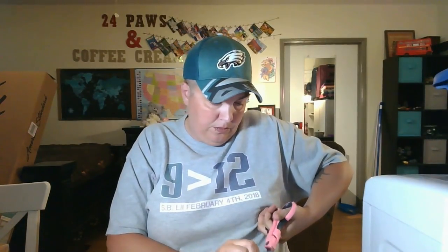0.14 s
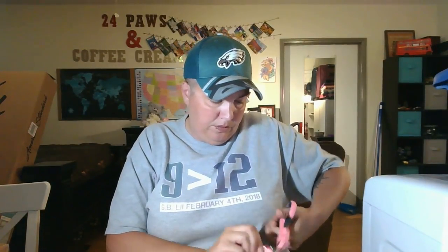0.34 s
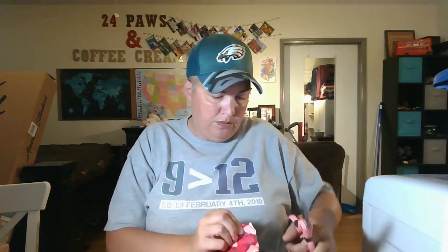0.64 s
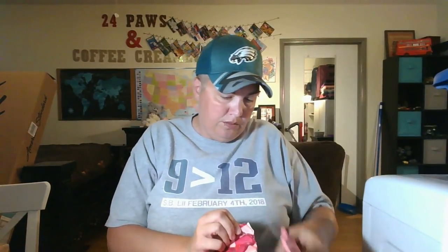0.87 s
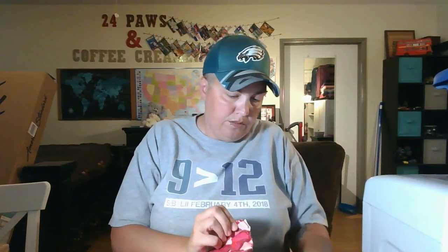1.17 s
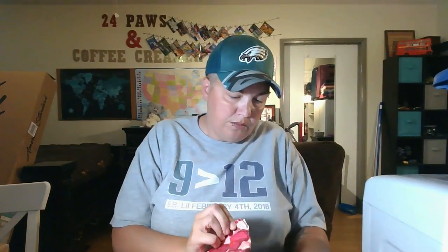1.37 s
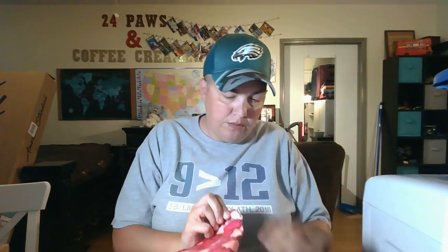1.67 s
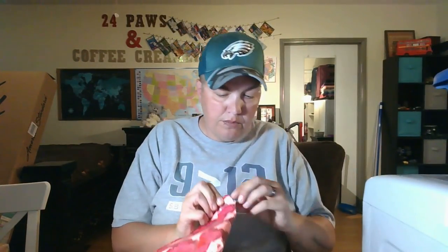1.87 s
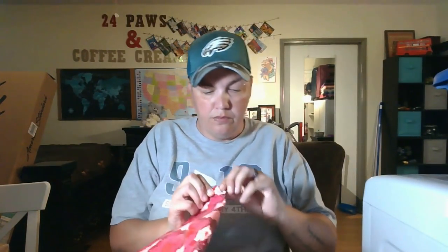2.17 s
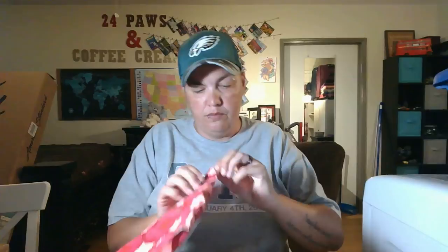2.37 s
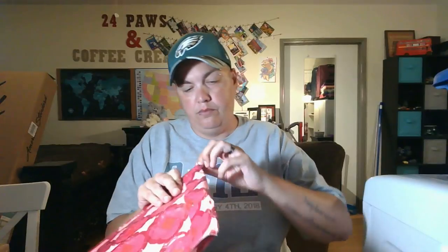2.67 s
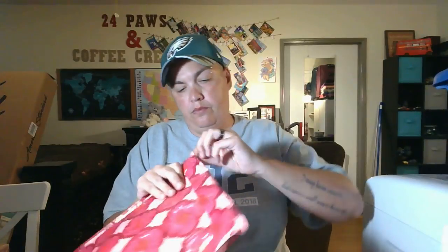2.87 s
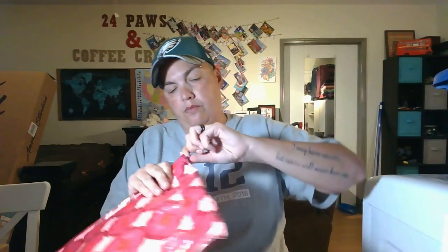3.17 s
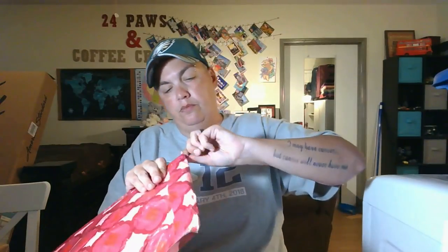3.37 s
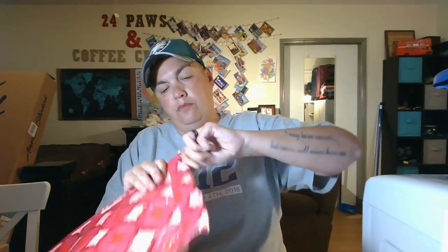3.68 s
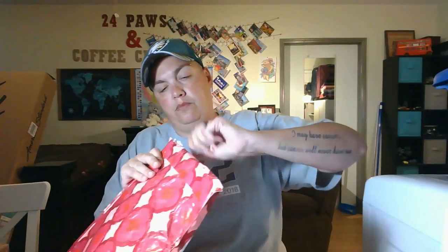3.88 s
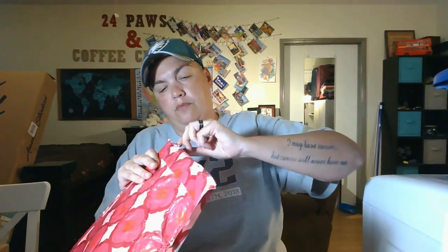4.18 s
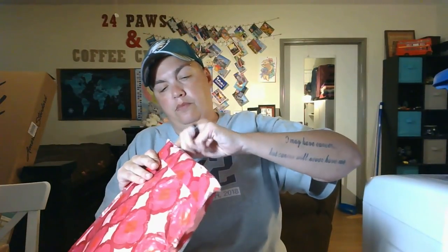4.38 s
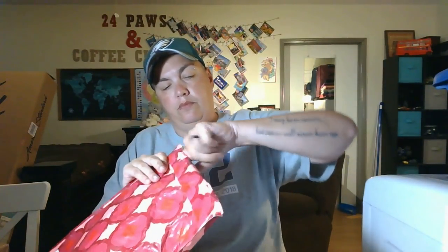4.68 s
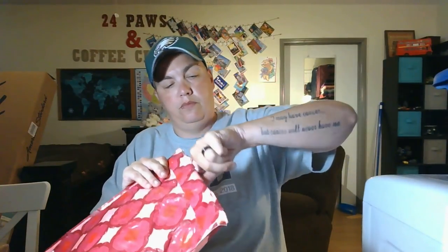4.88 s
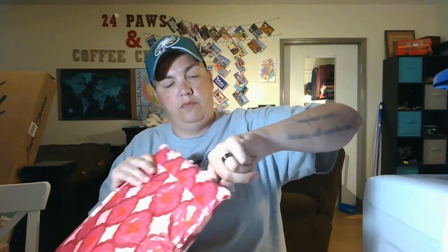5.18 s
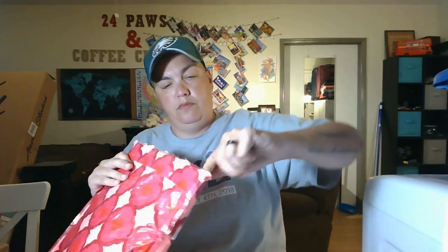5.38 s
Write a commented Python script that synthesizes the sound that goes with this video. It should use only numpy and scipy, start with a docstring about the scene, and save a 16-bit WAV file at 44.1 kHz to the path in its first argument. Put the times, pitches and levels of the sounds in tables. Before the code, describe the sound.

In a small, dull-sounding room, someone unwraps a gift near a low-quality microphone. A few light paper crinkles come first, with short gaps of dead silence. A tool clacks and slides on a tabletop, which thumps several times. After that the paper crackles and rips in quick, uneven strokes, with fingers rubbing and the hollow package popping softly underneath, loudest in the last second.

```python
"""Hands crumple, pull and tear the paper wrapped round a hollow package, close to a webcam indoors.
Each stroke buckles the sheet in countless tiny impulses; creases snap, the sheet pops, fingers rub,
and the package resonates. Early on a tool is dropped and slid on the table, whose modes boom.
The webcam samples at a low rate and passes sound only in stretches, with dead silence between them."""
import sys
import numpy as np
from scipy import signal
from scipy.fft import rfft, irfft, next_fast_len
from scipy.io import wavfile
from scipy.ndimage import uniform_filter1d, map_coordinates

SR = 44100
rng = np.random.default_rng(int(sys.argv[2]) if len(sys.argv) > 2 else 0)


def dump(signal):
    """Clip the signal to [-1, 1] and save it as 16-bit WAV at the path in sys.argv[1]."""
    limited = np.clip(np.atleast_2d(signal).T, -1, 1)
    pcm = np.round(limited * 32767).astype(np.int16)
    wavfile.write(sys.argv[1], SR, pcm)


N = 244314
T = np.arange(N) / SR


def amp(db):
    return 10 ** (np.asarray(db) / 20)


def unit(x):
    return x / np.sqrt(np.mean(x ** 2) + 1e-20)


def decay(t, t60):
    """Exponential damping: unity until t = 0, then 60 dB down every t60 seconds."""
    return amp(-60 * np.maximum(t, 0) / t60)


def rise(t, tau):
    """First-order onset from t = 0, with time constant tau in seconds."""
    return 1 - np.exp(-np.maximum(t, 0) / tau)


def after(start, lasts):
    """The samples of an event, and the time since its start."""
    span = slice(round(start * SR), round((start + lasts) * SR))
    return span, np.maximum(T[span] - start, 0)


def wobble(rate):
    """Smooth random modulation, with rate knots a second."""
    return map_coordinates(rng.standard_normal(int(N * rate / SR) + 4), [T * rate])


def filtered(x, response):
    """Linear filtering: the spectrum of x times a frequency response."""
    size = next_fast_len(N + SR // 2)
    return irfft(rfft(x, size) * response(np.fft.rfftfreq(size, 1 / SR)), size)[:N]


def modes(rows):
    """Modal superposition: resonances (frequency in Hz, bandwidth in Hz, dB) add with alternating sign."""
    return lambda f: sum((-1) ** k * amp(db) * 1j * f * width / (hz * hz - f * f + 1j * f * width)
                         for k, (hz, width, db) in enumerate(rows))


def grains(count, hz, spread, cycles, scatter_db, samples):
    """Shot noise: damped sines at random times and levels, their pitches log-normal about hz."""
    start = rng.integers(0, N, count)[:, None]
    pitch = np.clip(hz * np.exp(spread * rng.standard_normal((count, 1))), 60, SR / 5)
    level = amp(scatter_db * np.minimum(rng.exponential(size=(count, 1)), 3.5))
    sign = rng.choice([-1, 1], (count, 1))
    turns = pitch * np.arange(samples) / SR
    wave = sign * level * np.sin(2 * np.pi * turns) * np.exp(-turns / cycles) * np.sqrt(pitch)
    return unit(np.bincount((start + np.arange(samples)).ravel(), wave.ravel(), N + samples)[:N])


def drifting(x, depth_db, bins=8, frames=14):
    """Spectral modulation: random patches of gain in frequency and time make the timbre drift."""
    spectrum = signal.stft(x, nperseg=256)[2]
    field = uniform_filter1d(rng.standard_normal(spectrum.shape), bins, axis=0)
    field = uniform_filter1d(field, frames, axis=1)
    return unit(signal.istft(spectrum * amp(depth_db * unit(field)), nperseg=256)[1][:N])


def patchy(depth_db):
    """Modulated white noise whose timbre flickers."""
    return drifting(rng.standard_normal(N), depth_db, bins=4, frames=9)


def room(x):
    """Reverberation: a small furnished room answers with a short, dull tail."""
    t = np.arange(SR // 3) / SR
    tail = rng.standard_normal(len(t)) * decay(t, 0.093)
    wet = signal.fftconvolve(np.pad(x, (300, 0)), tail / np.linalg.norm(tail))[:N]
    return filtered(wet, modes([(1350, 7800, 0.016)]))


# Modes of the table top. Each row: frequency in Hz, bandwidth in Hz, gain in dB.
TABLE_MODES = [(119.7, 21.3, 0), (174, 27.3, 0), (211.1, 13.8, 5.5), (275, 28, 3), (444, 67, -8),
               (580, 41, -26)]
# Blows of the tool. Each row: start in seconds, level in dB, chatter length in seconds, clatter in dB,
# main pitch in Hz, hum in dB, seconds until the hum is damped, then the second, third and lowest
# mode in dB. All later dB values are relative to the level.
TOOL_BLOWS = [(1.151, -23, 0.0067, -19.5, 227, -19, .01, -6.5, -3.5, -11),
              (1.159, -7.5, 0.047, -15.5, 185.7, -25, 0.33, -5, -10, -1),
              (1.214, -11, 0.029, -15.5, 185, -16, 0.25, 1, -2, -11),
              (1.252, -11.5, 0.0076, -34, 148, -20, 0.034, -7, -14, -8),
              (1.459, -20, 0.035, -21, 279.3, -7.5, 0.062, -8.5, -9.5, -7.5),
              (1.522, -5, 0.044, -25.5, 189, -16, 0.12, -5.5, -15, -11),
              (1.653, -5, 0.047, -25.5, 197.7, -10, 0.1, -12, -15.5, -11),
              (1.756, -11.5, 0.047, -25.5, 204.2, -9, 0.071, -2.5, -16, -16),
              (1.881, -26, 0.018, -30.5, 189.5, -23.5, 0.03, -13.5, -27, -20.5),
              (1.917, -28, 0.022, -33, 201, -26, 0.034, -14, -18.5, -6)]


def tool_on_table(hum_gain):
    """Forced vibration: the chattering tool and the package drive the table's modes; the tool clatters."""
    free_t60_s, hand_damped_t60_s, lowest_hz = 1.07, 0.1, 120.9
    boom_gain, clatter_gain, tones = hum_gain.copy(), np.zeros(N), np.zeros(N)
    waver = wobble(40)
    for start, db, lasts, clatter_db, hz, hum_db, hum_s, second_db, third_db, low_db in TOOL_BLOWS:
        t = np.maximum(T - start, 0)
        chatter = rise(t, 0.0012) * decay(t - lasts, 0.053)
        hum = rise(t, 0.013) * decay(t, free_t60_s) * decay(t - hum_s, hand_damped_t60_s)
        boom_gain += amp(db - 7.5) * chatter + amp(db + hum_db) * hum
        partials = [(hz, 0, 0.5), (272, second_db, -0.5), (451, third_db, 1.3),
                    (578, third_db - 8.5, -0.99)]
        for mode_hz, mode_db, waver_rad in partials:
            tones += amp(db + mode_db) * chatter * np.sin(2 * np.pi * mode_hz * t + waver_rad * waver)
        lingering = chatter + (t > 0) * amp(-12.5) * decay(t, 1.2)
        tones += amp(db + low_db) * lingering * np.sin(2 * np.pi * lowest_hz * t + 0.34 * waver)
        contact = chatter * decay(t, 0.69) + 0.54 * (t > 0) * decay(t, 0.0098)
        ring = amp(-3) * rise(t, 0.0021) * decay(t, 0.33)
        clatter_gain += amp(db + clatter_db) * (contact + ring)
    pushes = grains(1500, hz=540, spread=0.9, cycles=0.13, scatter_db=-1.5, samples=300)
    boom = filtered(pushes + 0.5 * rng.standard_normal(N), modes(TABLE_MODES))
    boom /= np.abs(uniform_filter1d(boom ** 2, size=900)) ** 0.3  # limiter-like levelling steadies it
    return boom_gain * unit(boom) + tones + clatter_gain * tool_clatter()


# Modes of the tool. Each row: frequency in Hz, bandwidth in Hz, gain in dB.
TOOL_MODES = [(547, 31, 13.5), (767, 81, 6), (988, 70, 8), (1313, 240, 3), (1910, 157, 1.5), (2180, 83, 2),
              (2540, 51, -3.5), (2700, 240, -13.5), (4870, 1500, -19)]


def tool_clatter():
    """Broadband excitation: noise and tiny impacts sound the tool's own resonances."""
    noise = patchy(4.5)
    impacts = grains(3000, hz=2306, spread=0.69, cycles=0.24, scatter_db=-0.5, samples=80)
    return unit(filtered(noise + 0.15 * impacts, modes(TOOL_MODES)))


# Strikes of the tool's edge. Each row: start in seconds, level in dB, pitch in Hz, relative ring in dB.
EDGE_STRIKES = [(1.16, -14, 4250, -19), (1.223, -31, 4930, -3), (1.527, -32, 1480, -14),
                (1.654, -11, 2970, -9)]
# Modes of the blades. Each row: frequency in Hz, gain in dB, 60 dB decay time in seconds.
BLADE_MODES = [(1210, 3.5, .04), (2260, -9.5, 0.091), (2720, -15, 0.17), (3070, -16, 0.049),
               (3280, -6.5, 0.029)]


def tool_clacks():
    """Hard impact: a burst of band noise, after which the blades ring in free vibration."""
    x, noise = np.zeros(N), rng.standard_normal(N)
    for start, db, hz, ring_db in EDGE_STRIKES:
        burst = amp(db) * noise * rise(T - start, 0.00068) * decay(T - start, 0.011)
        x += filtered(burst, modes([(hz, 1500, 6)]))
        span, t = after(start, 0.3)
        for mode_hz, mode_db, t60 in BLADE_MODES:
            level = amp(db + ring_db + mode_db + rng.normal(0, 1.7))
            x[span] += level * decay(t, t60) * np.sin(2 * np.pi * mode_hz * t)
    return x


# Light rubs. Each row: start and length in seconds, then level at the body and at the open end in dB.
FINGER_RUBS = [(0.49, 0.22, -47, -48.5), (0.774, 0.16, -65, -65.5), (0.983, 0.11, -80, -58.5),
               (3.894, 0.18, -45.5, -40.5), (4.06, 0.087, -58, -62), (4.16, 0.16, -50, -47.5),
               (4.802, 0.046, -37, -41), (5.022, 0.13, -26.5, -24), (5.264, 0.17, -49, -32.5)]
# Rubbed modes of the body and of the open end. Each row: frequency in Hz, bandwidth in Hz, gain in dB.
RUB_BODY_MODES = [(686, 95, 2.5), (920, 340, -5.5)]
RUB_END_MODES = [(1202, 72, 6.5), (940, 310, -6.5)]


def finger_rubs():
    """Friction noise: sliding fingers excite the middle resonances of the package."""
    body = unit(filtered(patchy(2.5), modes(RUB_BODY_MODES)))
    open_end = unit(filtered(patchy(2.1), modes(RUB_END_MODES)))
    x, fade_s = np.zeros(N), 0.034
    for start, lasts, body_db, end_db in FINGER_RUBS:
        contact = np.clip(np.minimum(T - start, start + lasts - T) / fade_s, 0, 1)
        x += contact * (amp(body_db) * body + amp(end_db) * open_end)
    return x


# Flexes of the sheet. Each row: start in seconds, level in dB, pitch in Hz.
SHEET_FLEXES = [(2.413, -12, 466), (2.554, -19.5, 479), (2.577, -13, 257.5), (2.823, -16.5, 455),
                (2.979, -16.5, 266), (3.214, -13.5, 262), (3.27, -22, 253), (3.299, -22.5, 583),
                (3.422, -24.5, 483), (3.468, -17, 227), (3.561, -13.5, 458), (3.613, -15.5, 231),
                (3.667, -13, 485), (3.72, -14, 473), (3.755, -12, 468), (3.815, -17.5, 493),
                (4.379, -15.5, 524), (4.419, -21, 457), (4.549, -13, 617), (4.611, -9, 630),
                (4.639, -17, 600), (4.719, -14, 588), (4.75, -13.5, 595), (4.795, -11.5, 253),
                (4.957, -11.5, 208), (5.049, -16, 302), (5.129, -13, 475), (5.224, -10.5, 540),
                (5.299, -14, 459), (5.349, -22, 563)]


def sheet_pops():
    """Damped oscillation: the sheet flexes over the hollow with a soft, low, wavering tone."""
    x, waver = np.zeros(N), wobble(60)
    for start, db, hz in SHEET_FLEXES:
        span, t = after(start, 0.5)
        envelope = amp(db) * rise(t, 0.004) * decay(t, 0.073)
        x[span] += envelope * np.sin(2 * np.pi * hz * t + 0.62 * waver[span])
    return x


# Modes of the hollow package, three of the body and then two of the open end.
# Each row: frequency in Hz, bandwidth in Hz, gain in dB.
PACKAGE_MODES = [(472, 55, -1), (615, 60, -1), (940, 140, -10), (1215, 110, 1), (1370, 120, -3)]
# Snapping creases. Each row: start in seconds, strength in dB, pitch in Hz, relative thump drive in dB.
CREASE_SNAPS = [(0.34, -29, 5250, -11), (0.3459, -32, 1740, 9), (0.3715, -10, 2470, 8.5),
                (0.4987, -26.5, 1450, 7), (0.5167, -26.5, 4420, 6), (0.719, -45.5, 5460, -5),
                (0.8487, -40.5, 6020, -19), (0.958, -49, 6220, -11.5), (1.337, -36, 2050, 9),
                (1.4223, -33, 4340, -6), (1.971, -23, 5990, 1.5), (2.106, -50, 2050, -14),
                (2.1625, -32, 3470, -7), (2.282, -6.5, 3060, -34), (2.409, -10.5, 1526, 4.5),
                (2.5524, -23.5, 1570, 7), (2.6653, -6, 5040, -30), (2.735, -22.5, 2070, -29),
                (2.8186, -30, 2840, 12.5), (2.913, -25, 7260, -28), (3.0625, -7, 1387, -38),
                (3.067, -8, 887, -28), (3.072, -20, 2670, -21), (3.1804, -26, 3880, 6.5),
                (3.218, -13, 1220, -1), (3.349, -10.5, 2880, -26), (3.4537, -21, 2570, -3),
                (3.5136, -7.5, 5240, -6), (3.5468, -15, 2660, -25), (3.5982, -14.5, 1507, -24),
                (3.6365, -5.5, 2780, -20), (3.6606, -4, 1460, -18.5), (3.6903, -5, 2990, -32),
                (3.7054, -7, 2860, -30), (3.716, -9, 2930, -27), (3.737, -9, 2350, -37),
                (3.7753, -6, 2475, -7.5), (3.8075, -20, 2340, -15), (3.8335, -5.5, 1287, -26),
                (3.836, -11.5, 3480, -30), (3.855, -12.5, 2144, -15), (4.1124, -37.5, 3400, -17),
                (4.3732, -19, 2255, -24), (4.404, -13.5, 2130, -18), (4.5216, -10.5, 2956, -26),
                (4.5343, -4.5, 2504, -29), (4.705, -9, 2410, 4), (4.7326, -10, 2320, -24),
                (4.751, -12, 2494, -12), (4.79, -8.5, 2575, -12), (4.8522, -11, 1257, -11),
                (4.855, -19.5, 2340, -22), (4.924, -8, 2520, -31), (4.964, -10.5, 5360, -15),
                (4.985, -11, 4560, -21), (4.9926, -5, 2720, -22), (5.0824, -9, 2216, 3),
                (5.111, -6, 2080, -8.5), (5.1576, -7.5, 4390, -6), (5.248, -10, 1735, 9.5),
                (5.135, -5, 1327, -18), (5.279, -7, 1335, -16), (5.294, -9, 3370, -25),
                (5.349, -16.5, 3680, -12), (5.2693, -6.5, 1243, -4), (5.3051, -8, 1575, 0.5),
                (5.529, -2.5, 2330, -11)]


def crease_snaps():
    """Impulse response: a crease cracks, rings its facet, leaves a papery tail and thumps the package."""
    cracks, blows = np.zeros(N + SR), np.zeros(N)
    t = np.arange(SR // 8) / SR
    for start, db, hz, thump_db in CREASE_SNAPS:
        noise, wander = rng.standard_normal((2, len(t)))
        phase = 2 * np.pi * hz * t + 0.22 * np.cumsum(wander)
        partials = np.sin(phase) + 0.5 * np.sin(0.57 * phase) + 0.14 * np.sin(2.8 * phase)
        crack = (2.3 * np.sin(phase) + 1.4 * noise) * decay(t, 0.006)
        facet = (0.064 * noise + 0.32 * partials) * decay(t, 0.033)
        tail = 0.021 * noise * decay(t, 0.18)
        onset = round(start * SR)
        cracks[onset:onset + len(t)] += amp(db) * (crack + facet + tail) * rise(t, 0.0008)
        blows[onset] = amp(db + thump_db + 24)
    thumps = filtered(blows, modes([(343, 164, 4.4), *PACKAGE_MODES]))
    return filtered(cracks[:N], modes([(2900, 8100, 0.0026)])) + thumps


# Strokes of the hands. Each row: start and hold in seconds, crackle level in dB, drift over the hold
# in dB, then drum, table hum, open end and folded flap in dB relative to the crackle.
HAND_STROKES = [(0, 0.067, -35.5, -31.5, -13, -12, -12, -2.5), (0.325, 0.088, -43.5, 7, 10.5, 5.5, -11, -7),
                (0.482, 0.22, -41, -22, 5, 2, 3, -16), (0.714, 0.22, -64, -5, -1, 1, -6.5, -10),
                (0.96, 0.13, -69, -2, -1, -2.5, -2.5, -16.5), (1.355, 0.08, -57.5, 1.5, 7, 6, -3.5, -8),
                (1.788, 0.12, -63, 0, -6, -6, -4, -15), (1.863, 0.13, -66, 20.5, 5, 9, -1, -20),
                (2.088, 0.14, -56.5, 10.5, 6, 6.5, -4.5, -7),
                (2.272, 0.066, -30, -5.5, -8.5, -10.5, -5.5, -17),
                (2.376, 0.013, -27.5, -13.5, -4, -12, -10, -17),
                (2.399, 0.12, -32, -13, 2, -11.5, -14, -1.5), (2.505, 0.055, -42.5, 1.5, 9, 6, 3, -3),
                (2.55, 0.095, -27, -5.5, -4, -12, -9.5, -7), (2.661, 0.046, -24.5, -9, -0.5, -18, -3, -12),
                (2.725, 0.028, -34, -8, -5, -13, -11, -18), (2.772, 0.041, -45, 5, -14, -22, -12, -9),
                (2.81, 0.12, -36.5, -13.5, 8, 1.5, -3.5, -5),
                (2.917, 0.11, -28.5, -4.5, 0, -17.5, -11.5, -8.5),
                (3.045, 0.057, -25.5, -4, -4, -14, -10, -11), (3.098, .09, -39, 2.5, -1, -3, -2, -0.5),
                (3.194, 0.16, -28.5, -7, 0, -12, -7.5, -23), (3.372, 0.07, -45.5, 2.5, 0.5, -9.5, -7, -1),
                (3.446, 0.11, -33.5, 9, -3, -16.5, -18.5, -6), (3.583, 0.086, -31.5, 2, 4, -9, 3, 0),
                (3.681, 0.09, -22.5, 0.5, -4, -5.5, -19, 0.5), (3.792, 0.056, -40.5, 7.5, -2, -8, 5.5, 2),
                (3.886, 0.13, -47.5, 1, 2, -4.5, 1, -1), (4.024, 0.084, -55.5, -8, -1, 5, -11, -6),
                (4.121, 0.14, -40.5, -18.5, -4.5, -4, -15.5, -4.5),
                (4.27, 0.11, -54, 16.5, -3.5, -16, -23, -2.5), (4.376, .13, -26, -3, -4, -17, -14, -6.5),
                (4.524, 0.18, -23.5, -1, -3.5, -9.5, -7, -3), (4.704, 0.099, -20, -2, -5, -11, -5.5, -5.5),
                (4.842, 0.057, -32, -7.5, 1, -3.5, 4, -1.5),
                (4.92, 0.271, -21.5, -1.5, -2.5, -5, -4, -10.5),
                (5.199, 0.17, -23.5, 3, -1.5, -8.5, -4.5, -24),
                (5.384, 0.138, -41, 0.5, 2, -11, -7.5, -8.5), (5.521, 0.0285, -34, 3.5, 14, 1, -8, 10.5)]


def hand_strokes():
    """Incoherent addition: strokes rise, hold and die away, summing in power to five layer gains."""
    grip_s, release_db_per_s, table_lag_s = 0.012, 607.5, 0.0062
    power = np.zeros((5, N))
    for start, holds, db, drift_db, *layers_db in HAND_STROKES:
        span, t = after(start, holds + 0.5)
        shape_db = db + drift_db * np.clip(t / holds, 0, 1) - release_db_per_s * np.maximum(t - holds, 0)
        envelope = np.clip(t / grip_s, 0, 1) * amp(shape_db)
        power[:, span] += (envelope * amp([0, *layers_db])[:, None]) ** 2
    power[2] = np.abs(uniform_filter1d(power[2], round(table_lag_s * SR)))  # the heavy top is sluggish
    return np.sqrt(power)


# Spectral envelope of the crackle. Each row: frequency in Hz, gain in dB.
CRACKLE_SPECTRUM = [(820, -40.5), (1400, -0.5), (1870, -2), (2600, -2.5), (4160, 0.5), (4460, 1),
                    (4850, -2), (5280, -1), (6800, 1.5), (7500, -7.5), (9750, -40), (16500, -120)]
# Narrow room and microphone resonances that colour the crackle, and modes of the stiff folded flap.
# Each row: frequency in Hz, bandwidth in Hz, gain in dB.
ROOM_MIC_MODES = [(2730, 33, -5), (4496, 35, 4), (5160, 440, 3.5)]
FLAP_MODES = [(2300, 470, -0.5), (2680, 260, 11), (3140, 440, -10.5)]


def paper_rustle(crackle_gain, drum_gain, end_gain, flap_gain):
    """Buckling: clumps of tiny impulses ring the paper's facets, the package, its open end and its flap."""
    def sheet(f):
        hz, db = np.transpose(CRACKLE_SPECTRUM)
        colouring = 1 + 0.64 * np.abs(modes(ROOM_MIC_MODES)(f))
        return amp(np.interp(np.log(f + 1), np.log(hz), db)) * colouring

    def hollow(f):
        return modes(PACKAGE_MODES[:3])(f) + modes([(800, 1100, -15)])(f)

    clumps = wobble(110)
    ticks = grains(9000, hz=3320, spread=0.53, cycles=0.37, scatter_db=3.5, samples=100)
    facets = grains(4000, hz=2300, spread=0.5, cycles=28, scatter_db=3, samples=900)
    fibres = grains(1400, hz=2400, spread=0.5, cycles=1.2, scatter_db=4.5, samples=120)
    crackle = filtered(0.59 * ticks + 0.9 * facets + 0.53 * fibres + 1.07 * patchy(2.2), sheet)
    crackle = drifting(amp(0.97 * clumps) * crackle, depth_db=2.5)
    large_buckles = grains(2500, hz=873, spread=0.45, cycles=1.98, scatter_db=1.5, samples=500)
    drum = filtered(large_buckles + 0.17 * patchy(2.5), hollow)
    drum = drifting(amp(1.1 * clumps) * drum, depth_db=4)
    end_flutter = amp(2.5 * wobble(70))
    open_end = unit(end_flutter * filtered(1.1 * large_buckles + patchy(2), modes(PACKAGE_MODES[3:])))
    flap = filtered(ticks + 0.7 * facets + 1.6 * patchy(2.8), modes(FLAP_MODES))
    flap = unit(amp(2.2 * clumps) * flap)
    return crackle_gain * crackle + drum_gain * drum + end_gain * open_end + flap_gain * flap


def scene():
    """Superposition: the paper, its reverberation, the table and the tool add in one channel."""
    crackle_gain, drum_gain, hum_gain, end_gain, flap_gain = hand_strokes()
    paper = paper_rustle(crackle_gain, drum_gain, end_gain, flap_gain)
    paper += crease_snaps() + sheet_pops() + finger_rubs()
    reverberation = amp(-11) * room(paper)
    lumpy_hum_gain = hum_gain * amp(4 * wobble(25))
    return (paper + reverberation + tool_on_table(lumpy_hum_gain) + tool_clacks())[None]


# Stretches in which the webcam passes sound. Each row: opening and closing time in seconds.
GATE_TIMES = [(-.1, .07), (.33, .43), (.492, 1.098), (1.152, 1.995), (2.098, 2.252), (2.274, 2.359),
              (2.378, 6)]


def record(dry):
    """Band limiting and imaging: the webcam cuts bass, clips softly, gates and mirrors its top treble."""
    bass_hz, clip_level, treble_hz, sampling_hz, top_hz = 70, 0.86, 7540, 16000, 8926
    x = filtered(dry[0], lambda f: (1j * f / (bass_hz + 1j * f)) ** 3)
    x = x / (1 + np.abs(x / clip_level) ** 4) ** (1 / 4)
    gate = sum(np.clip(np.minimum((T - opens) / 0.021, (closes - T) / 0.013) + 1, 0, 1) ** 3
               for opens, closes in GATE_TIMES)
    x = filtered(x * gate, lambda f: 1 / (1 + (f / treble_hz) ** 260))
    image = amp(-14.5) * x * np.cos(2 * np.pi * sampling_hz * T)
    x = x + filtered(image, lambda f: f > sampling_hz / 2 + 410)
    return filtered(x, lambda f: 1 / (1 + (f / top_hz) ** 90))[None]


dry = scene()
out = record(dry)
dump(out)
```